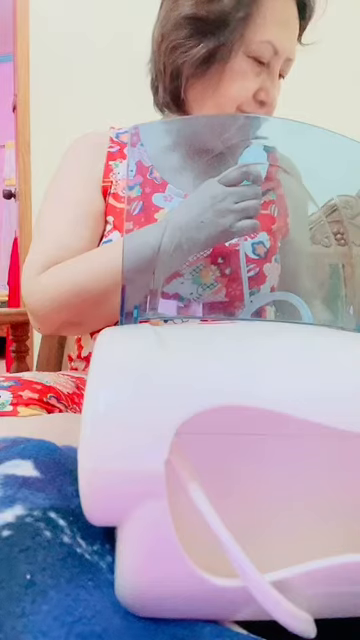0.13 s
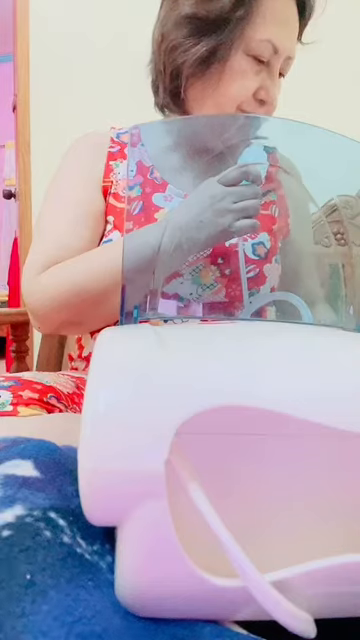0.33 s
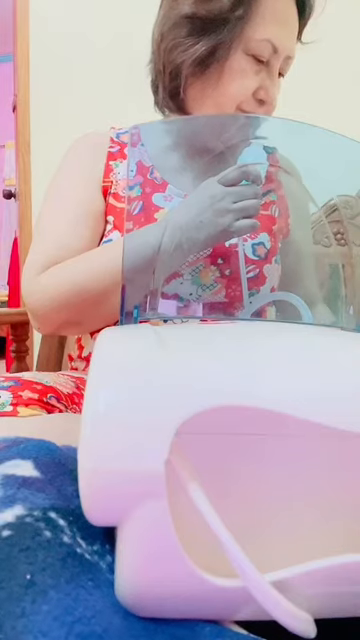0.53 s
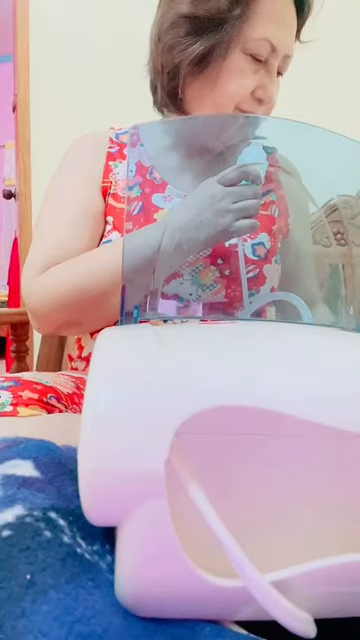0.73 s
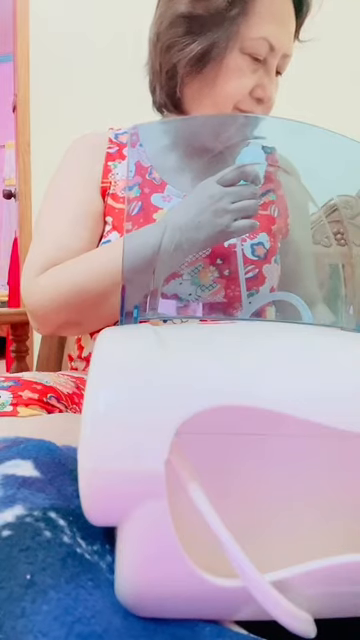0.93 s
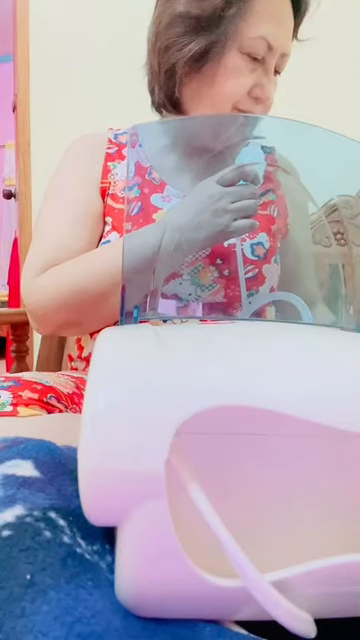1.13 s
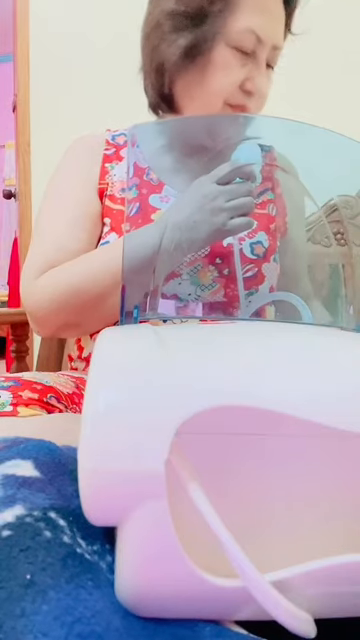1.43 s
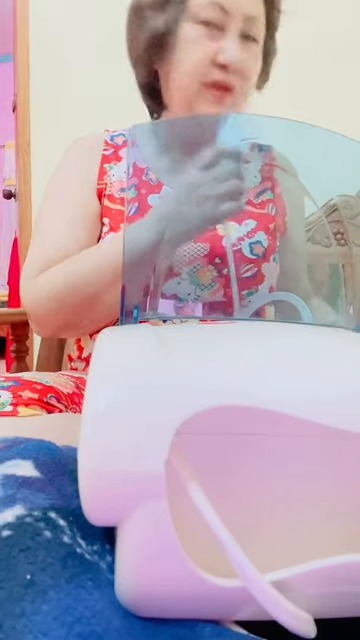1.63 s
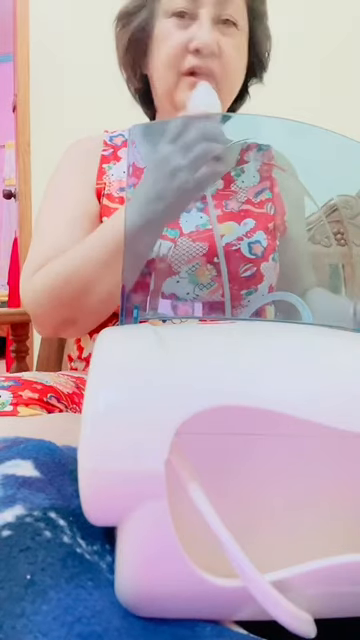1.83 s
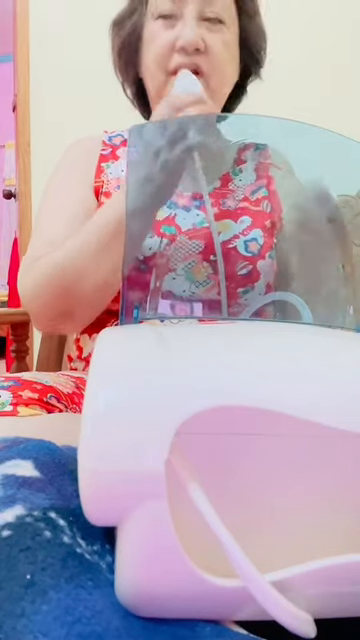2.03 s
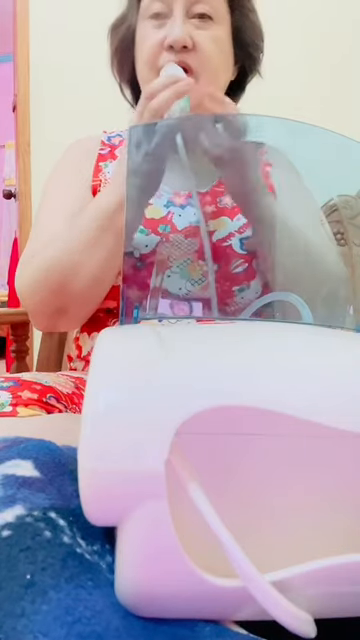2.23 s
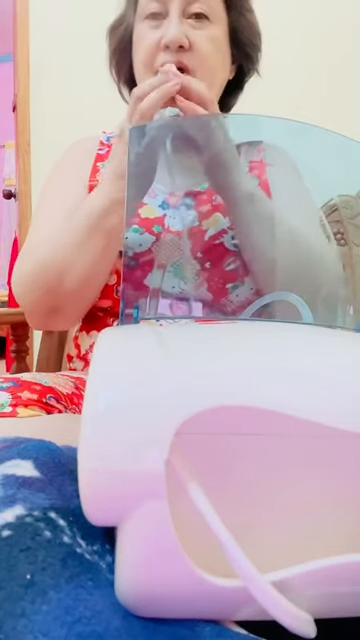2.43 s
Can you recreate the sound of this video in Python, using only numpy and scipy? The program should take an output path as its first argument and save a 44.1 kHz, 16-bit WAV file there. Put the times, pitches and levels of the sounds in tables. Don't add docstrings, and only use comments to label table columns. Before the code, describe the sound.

Steady throbbing motor buzz of a small air compressor, its nozzle's whistling hiss fading halfway through

```python
import sys
import numpy as np
from scipy import signal
from scipy.fft import rfft, irfft
from scipy.io import wavfile
from scipy.ndimage import uniform_filter1d

SR = 44100
rng = np.random.default_rng(int(sys.argv[2]) if len(sys.argv) > 2 else 0)


def generate_wav(signal):
    frames = np.transpose(np.atleast_2d(signal))
    scaled = np.clip(frames, -1, 1) * 32767
    pcm = np.round(scaled).astype(np.int16)
    wavfile.write(sys.argv[1], SR, pcm)


def field_ratio(decibels):
    return 10 ** (np.asarray(decibels, dtype=float) / 20)


N = 114219

SHAFT_HZ, PULL_HZ = 53.056, 119.94
SLIP_HZ = PULL_HZ - 2 * SHAFT_HZ

SHAFT_ORDERS = [(1, 0), (2, 0), (3, 0), (4, 0), (5, 0), (6, 0), (9, 0), (10, 0), (11, 0), (13, 0), (15, 0),
                (16, 0), (17, 0), (0, 1)]
SIDE_ORDERS = [(1, 1), (2, 1), (3, 1), (6, 1), (7, 1), (-1, 2), (0, 2), (1, 2), (4, 2), (5, 2), (11, 2),
               (-1, 3), (4, 3), (0, 4)]
SHAFT_PARTIAL_DB = [-46.5, -37.5, -48.5, -42.5, -66.5, -50, -43, -41, -42, -46, -40, -50, -41, -30.5]
SIDE_PARTIAL_DB = [-62.5, -44, -46.5, -46.5, -56, -53, -49.5, -40.5, -48.5, -45, -63.5, -69.5, -46.5, -62]
# frequency in Hz, rms level in dB.
ROOM_HUM = [(48.6, -53), (72.88, -47)]
# frequency in Hz, density in dB per Hz.
CASING_SPECTRUM = [(24, -49), (40, -19.5), (114, -17), (170, -7.5), (1620, -9), (1810, -5), (3340, -22),
                   (5280, -24.5), (7500, -30), (9750, -95), (16500, -120)]
# frequency in Hz, width in Hz, lift in dB.
CASING_RESONANCES = [(245, 90, -2), (313, 27, 0), (727, 40, -7.5), (816, 170, 7.5), (1158, 210, 3.5),
                     (1376, 89, 2.5), (1640, 360, -3), (1807, 63, 5.5), (1990, 65, 2), (2615, 142, 7),
                     (3640, 220, 10), (4155, 67, 9.5)]
# frequency in Hz, gain in dB.
KNOCK_TILT = [(200, -4), (700, -10), (2000, 2.5), (6000, -5.5)]
# frequency in Hz, gain in dB.
PUSH_TILT = [(200, -14), (800, -2.5), (2000, -8), (6000, -24)]
# frequency in Hz, gain in dB.
VALVE_SPECTRUM = [(2500, -34), (3600, -10), (4500, -9), (5000, 0), (5600, -1), (6600, -27.5), (9300, -28),
                  (11000, -70)]
# frequency in Hz, width in Hz, lift in dB.
VALVE_RESONANCES = [(4920, 200, 3), (5455, 100, 7)]
# start in seconds, peak level in dB.
VALVE_SLAPS = [(0.167, 0), (0.2415, 5), (0.2974, 2), (0.3734, 2), (0.505, 2), (0.5985, -5), (0.7326, 2),
               (0.8824, -19), (0.9567, -23), (1.0904, 0), (1.3917, 3), (1.505, 3), (1.5976, 4),
               (1.7489, -4), (1.8821, -14), (1.958, -8), (2.0323, -23), (2.2568, 6), (2.3984, 3),
               (2.4658, 2)]
# time in seconds, level of the jet in dB, level of the fine mist in dB.
NOZZLE_MOVES = [(.04, 2, 1), (.3, 0, 3), (.7, 0, 1), (1.2, -.5, 1), (1.38, -.6, 1), (1.44, -1, -1),
                (1.56, -5.5, -3), (1.68, -8, 0), (1.72, 1.5, 3), (1.82, -5, .4), (1.95, -4, 3),
                (2.05, -6, 1), (2.12, 0.5, 5), (2.2, -4, 2.5), (2.35, -4.5, 2), (2.59, -5.5, 0.5)]
# frequency in Hz, gain in dB.
JET_SPECTRUM = [(3000, -22), (4400, -11), (4700, 0.5), (5600, -3.5), (6300, -7), (7000, -26), (8200, -57.5),
                (10000, -42.5)]
# frequency in Hz, width in Hz, lift in dB.
JET_RESONANCES = [(5230, 300, 0.83), (6270, 140, 1.44), (9510, 900, 25)]
# frequency in Hz, gain in dB.
WHISTLE_SPECTRUM = [(3800, -49), (4500, -5.5), (4690, 6), (4880, 0), (5300, -33)]
# frequency in Hz, gain in dB.
MIST_SPECTRUM = [(6000, -65), (8000, -8.5), (9000, -3.5), (10300, -40), (11200, -8), (13500, -1.5),
                 (15000, 0), (16000, -26.5)]
# frequency in Hz, width in Hz, lift in dB.
MIST_RESONANCES = [(14300, 390, 11)]


def walk(rate):
    hold = int(SR / rate)
    steps = np.repeat(rng.standard_normal(N // hold + 1), hold)
    return 1.01 * uniform_filter1d(uniform_filter1d(steps, hold), hold)[:N]


def colour(x, points, resonances, db):
    n = 1 << 17
    hz = np.arange(n // 2 + 1) * SR / n + 1
    point_hz, point_db = np.array(points).T
    gain_db = np.interp(np.log(hz), np.log(point_hz), point_db)
    for centre, width, lift in resonances:
        gain_db = gain_db + lift / (1 + (2 * (hz - centre) / width) ** 2)
    cepstrum = irfft(np.log(field_ratio(gain_db)), n)
    cepstrum = cepstrum * np.r_[1, np.full(n // 2 - 1, 2.), 1, np.zeros(n // 2 - 1)]
    y = irfft(rfft(x, n) * np.exp(rfft(cepstrum)), n)[:N]
    return y * field_ratio(db) / np.std(y)


def contact(t, shaft_turn, pull_turn, shaft_sharpness, pull_sharpness, scatter_db):
    turn = SHAFT_HZ * t - shaft_turn
    pull = PULL_HZ * t - pull_turn
    sizes = field_ratio(scatter_db * rng.standard_normal(N // 500))
    size = sizes[np.round(turn).astype(int) + 1]
    on_shaft = shaft_sharpness * (np.cos(2 * np.pi * turn) - 1)
    on_pull = pull_sharpness * (np.cos(2 * np.pi * pull) - 1)
    return size * np.exp(on_shaft + on_pull) * np.sign(rng.standard_normal(N))


def hum(t):
    out = sum(field_ratio(db) * np.cos(2 * np.pi * hz * t) for hz, db in ROOM_HUM)
    shaft = SHAFT_HZ * t + 0.014 * walk(5.83) - 0.4
    pull = PULL_HZ * t - 0.92
    orders = SHAFT_ORDERS + SIDE_ORDERS
    levels = SHAFT_PARTIAL_DB + SIDE_PARTIAL_DB
    for (m, n), db in zip(orders, levels):
        turns = m * shaft + n * pull + 0.5
        scatter = 0.23 * rng.standard_normal() * (db < -40)
        out = out + field_ratio(db + 0.68 * walk(3)) * np.cos(2 * np.pi * (turns + scatter))
    return np.sqrt(2) * out


def casing(t):
    slip_beat = np.cos(2 * np.pi * (SLIP_HZ * t - 0.15))
    third_beat = np.cos(2 * np.pi * ((SHAFT_HZ - SLIP_HZ) * t - 0.43))
    throb_db = 2 * slip_beat + third_beat
    flicker_db = 0.8 * walk(6.18) + walk(150)
    rumble = field_ratio(throb_db + flicker_db) * rng.standard_normal(N)
    knock = contact(t, shaft_turn=0.45, pull_turn=0.847, shaft_sharpness=8.2, pull_sharpness=0.4,
                    scatter_db=1.2)
    push = contact(t, shaft_turn=0.714, pull_turn=0.4, shaft_sharpness=4.1, pull_sharpness=1.28,
                   scatter_db=1.2)
    knock = colour(knock, KNOCK_TILT, [], 0)
    push = colour(push, PUSH_TILT, [], 0)
    return (colour(rumble, CASING_SPECTRUM, CASING_RESONANCES, -24)
            + colour(knock, CASING_SPECTRUM, CASING_RESONANCES, -33.5)
            + colour(push, CASING_SPECTRUM, CASING_RESONANCES, -30))


def valve(t):
    chatter = contact(t, shaft_turn=0.87, pull_turn=0.92, shaft_sharpness=6, pull_sharpness=1.6,
                      scatter_db=1.5)
    rise_s, fall_s = 0.00049, 0.0037
    slaps = 0
    for start, db in VALVE_SLAPS:
        age = np.clip(t - start, 0, None)
        slaps = slaps + field_ratio(db) * (1 - np.exp(-age / rise_s)) * np.exp(-age / fall_s)
    slaps = slaps + field_ratio(-5) * np.roll(slaps, int(SR / PULL_HZ))
    grit = np.sign(rng.standard_normal(N))
    return (colour(chatter, VALVE_SPECTRUM, VALVE_RESONANCES, -32)
            + colour(slaps * grit, VALVE_SPECTRUM, VALVE_RESONANCES, -35))


def nozzle(t):
    move_s, jet_db, mist_db = np.array(NOZZLE_MOVES).T
    flutter_db = 0.8 * walk(6.75) + 1.5 * walk(90)
    beat_db = -0.2 * np.cos(2 * np.pi * (SLIP_HZ * t - 0.14))

    jet = field_ratio(flutter_db + beat_db) * rng.standard_normal(N)
    jet = colour(jet, JET_SPECTRUM, JET_RESONANCES, -24.5)
    jet = jet * field_ratio(np.interp(t, move_s, jet_db))

    whistle = field_ratio(flutter_db + 2 * walk(14.1)) * rng.standard_normal(N)
    whistle = colour(whistle, WHISTLE_SPECTRUM, [], -30)
    turned_s = 1.43
    whistle = whistle * field_ratio(np.interp(t, [turned_s - 0.03, turned_s + 0.034], [0, -13]))

    mist = field_ratio(0.6 * flutter_db + 1.4 * walk(12.5)) * rng.standard_normal(N)
    mist = colour(mist, MIST_SPECTRUM, MIST_RESONANCES, -44)
    mist = mist * field_ratio(np.interp(t, move_s, mist_db))
    return jet + whistle + mist


def scene():
    t = np.arange(N) / SR
    return (hum(t) + casing(t) + valve(t) + nozzle(t))[None]


def low_pass(x):
    return signal.sosfilt(signal.butter(12, 15730, fs=SR, output="sos"), x)


def record(dry):
    top_cut = signal.ellip(10, .2, 70, 15730, fs=SR, output="sos")
    heard = signal.sosfilt(top_cut, dry)
    opened = np.arange(N) > 0.0362 * SR
    return low_pass(heard * opened)


dry = scene()
out = record(dry)
generate_wav(out)
```